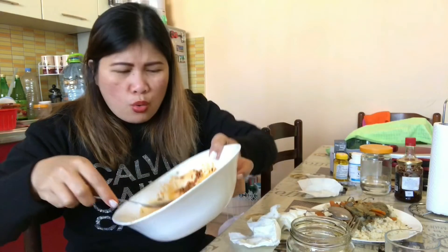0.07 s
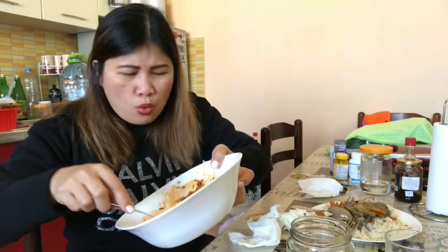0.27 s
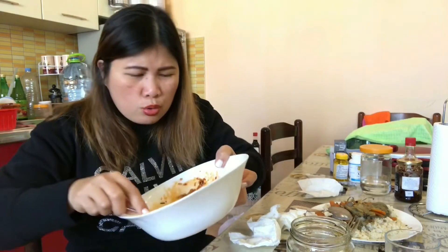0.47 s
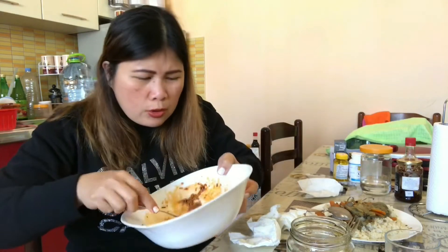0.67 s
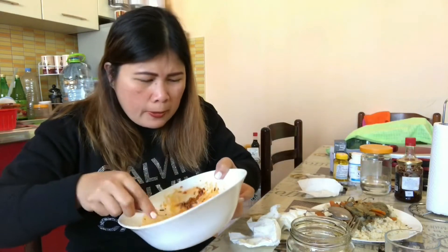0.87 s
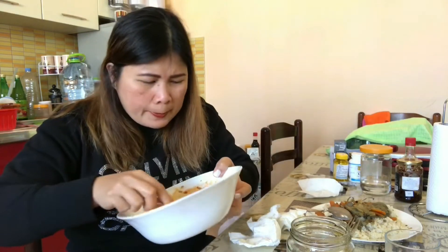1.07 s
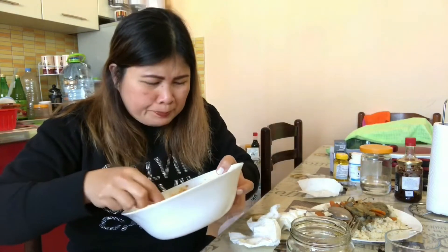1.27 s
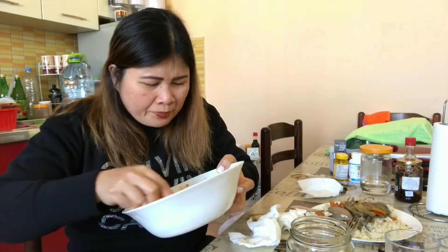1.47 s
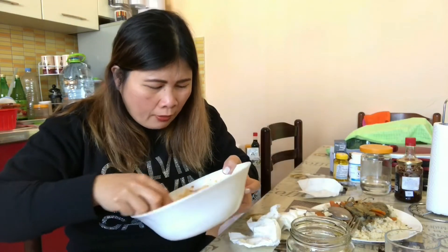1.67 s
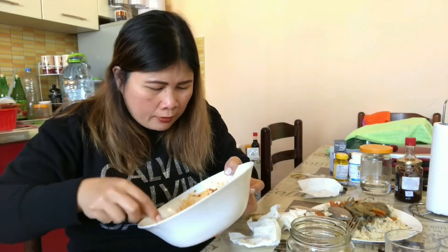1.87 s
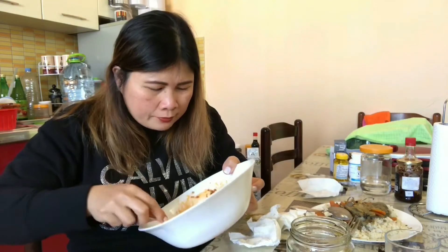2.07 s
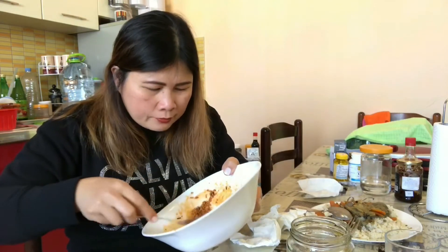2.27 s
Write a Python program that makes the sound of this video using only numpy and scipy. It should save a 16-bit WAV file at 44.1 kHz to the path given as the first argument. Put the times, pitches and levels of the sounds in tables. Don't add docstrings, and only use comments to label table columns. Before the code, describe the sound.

A fork scrapes a food-coated ceramic bowl in a quiet kitchen, ending with one hard ringing clank

```python
import sys
import numpy as np
from scipy import signal
from scipy.fft import rfft, irfft
from scipy.io import wavfile
from scipy.ndimage import uniform_filter1d

SR = 44100
rng = np.random.default_rng(int(sys.argv[2]) if len(sys.argv) > 2 else 0)


def generate_wav(sig):
    pcm = np.round(np.clip(np.atleast_2d(sig).T, -1, 1) * 32767).astype(np.int16)
    wavfile.write(sys.argv[1], SR, pcm)


def ratio(d):
    e = np.asarray(d, float) / 20
    return 10 ** e


N = 102576
MAIN_RING_HZ = 2930

# pitch_hz, level_db (per Hz)
WASH = [(35, -54), (60, -14.5), (130, -12.5), (252, -1), (600, -11.5), (1100, -11.5), (2500, -23),
        (16000, -46)]
# pitch_hz, width_hz, level_db
FRIDGE = [(47, 3.7, -64), (88.1, 8, -68), (171.6, 8.6, -60.5), (208, 8, -83), (260.5, 30, -63),
          (293.6, 7.5, -73), (345.7, 5.5, -73), (553, 1.33, -66)]
INSIDE_HZ = [1997, 2300, 2929, 2965, 4000, 4930, 5895, 6982, 7300, 7560, 8091, 9130, 11300, 5300]
# level_db, t60_s (time to fade by 60 dB)
INSIDE = [(-11, 0.12), (-7.5, 0.064), (6.7, 0.076), (-16, 0.011), (-24, .025), (-14, 0.072), (-7.5, 0.089),
          (-1.5, 0.068), (-5.5, 0.053), (-10, 0.091), (-18, 0.073), (-20, 0.066), (-15, 0.023),
          (-7.5, 0.092)]
# start_s, level_db, tilt_below_db_per_octave, tilt_above_db_per_octave, crack_db
TAPS = [
    (.0690, -54.5, 22.5, 7, -41.5),
    (.2225, -63, -5, 5.5, -49),
    (.2570, -50, -8, -20, -56),
    (.6330, -53.5, -7, -12, -75),
    (.8025, -47, -3, -3.5, -41),
    (.8480, -50, -17, -9, -68),
    (1.0775, -36.5, 20, 4.5, -36),
    (1.3605, -45.5, -22, -22, -71),
    (1.7710, -84, 10, 9, -70),
    (1.7935, -77, .1, 7, -56),
]
# pitch_hz, level_db (per Hz)
HISS = [(500, -20), (1500, -23), (4000, 5.5), (6000, 4.9), (7800, 0.5), (9000, -5.5), (12000, -8),
        (16000, -10)]
# start_s, length_s, ring_db, hiss_db, tilt_db_per_octave
SCRAPES = [(0.189, 0.086, -68, -64.5, 6), (0.254, .045, -58.5, -56.5, 12), (0.41, 0.082, -95, -76, 8),
           (0.621, 0.055, -51.5, -54, 7.5), (0.796, 0.037, -67, -60.5, -1), (0.837, 0.04, -58, -65, 2),
           (0.917, 0.157, -67, -53.5, 4.5), (1.072, 0.045, -51, -54.5, -0.5), (1.138, 0.063, -59, -58, 0),
           (1.189, 0.067, -50, -54, 2), (1.291, 0.08, -54.5, -56.5, -1), (1.35, 0.02, -46, -55, -6),
           (1.388, 0.013, -80, -56, -6)]
# pitch_hz, t60_s
TINES = [(2750, .008), (4100, .007), (5150, .008), (6000, .008), (7300, .008), (8600, .006), (11600, .005)]
# start_s, level_db, treble_tilt_db_per_octave
KNOCKS = [
    (.862, -39, -2.5),
    (.886, -43.5, -7.5),
    (1.0095, -33, -0.5),
    (1.021, -37, -15),
    (1.031, -37.5, -0.5),
    (1.078, -37.5, 1.5),
    (2.163, -44, 8),
]
# pitch_hz, level_db, t60_s
KNOCK = [(367, -5.3, 0.044), (455, 1.5, 0.015), (864, -4.5, 0.017), (1040, 5, 0.011), (1250, 9.5, 0.0083)]
RIM_HZ = [603, 1200, 1923, 2005, 2900, 2930, 5265, 5365, 5895, 6036, 6510, 6530, 7412, 9810]
# level_db, t60_s
RIM = [(-25.5, 0.22), (-4.5, 0.062), (-18, 0.15), (-15.5, .2), (-17.5, 0.15), (2.4, 0.046), (-1.5, 0.035),
       (0, 0.023), (-3, 0.046), (-13.5, 0.45), (-12.5, .3), (6, 0.045), (-13, 0.13), (-9, 0.047)]
FORK_HZ = [1420, 2170, 2400, 3550, 4400, 4970, 5120, 6240, 7030, 7850, 8650, 11480, 13406]
# level_db, t60_s
FORK = [(-4, 0.014), (0, 0.01), (-28, 0.06), (4, 0.0087), (-14, 0.051), (-11, 0.066), (-9.5, 0.055),
        (-14, 0.092), (-19, .06), (-12, 0.075), (-12, 0.079), (-24, 0.055), (-20, 0.046)]
# start_s, level_db, tilt_below_db_per_octave, tilt_above_db_per_octave, crack_db
BLOWS = [
    (2.0640, -61, -9, 3.8, -73),
    (2.0872, -12, -1.4, 0.033, -14.5),
]
# start_s, level_db, tilt_below_db_per_octave, tilt_above_db_per_octave, crack_db
BOUNCES = [
    (2.1612, -17, -18, -14, -34),
    (2.2925, -70, -9, -6, -56),
]


def table(rows):
    return np.array(rows, float).T


def colour(x, points, tilt_db=0.):
    hz, db = table(points)
    f = np.maximum(np.arange(len(x) // 2 + 1) * SR / len(x), 20)
    gain_db = np.interp(np.log(f), np.log(hz), db) + tilt_db * np.log2(f / 4000)
    return irfft(rfft(x) * ratio(gain_db), len(x))


def unit(x):
    return x / np.sqrt(np.mean(x ** 2))


def mode(x, hz, t60):
    r = np.exp(-np.log(1000) / (max(t60, .002) * SR))
    w = 2 * np.pi * hz / SR
    return signal.lfilter([0, r * np.sin(w)], [1, -2 * r * np.cos(w), r * r], x)


def walk(rate):
    k = int(SR / rate)
    steps = np.repeat(rng.standard_normal(N // k + 1), k)
    return 1.3 * uniform_filter1d(uniform_filter1d(steps, k), k)[:N]


def kitchen():
    wash_db, flicker_db, swell_db = -55, 1.88, 0.13
    spectrum = rfft(unit(colour(rng.standard_normal(N), WASH)))
    f = np.arange(N // 2 + 1) * SR / N
    swell = walk(0.85)
    out = np.zeros(N)
    for low_hz in 20 * 2. ** np.arange(11):
        octave = irfft(spectrum * (f >= low_hz) * (f < 2 * low_hz), N)
        out += octave * ratio(flicker_db * walk(8.77) + swell_db * swell)
    out *= ratio(wash_db)
    for hz, width, db in FRIDGE:
        out += ratio(db) * unit(mode(rng.standard_normal(N), hz, 3.1 / width))
    return out


def rustle():
    level_db, pitch_hz, fall_s = -57.5, 975, 0.28
    cloth = unit(mode(rng.standard_normal(N), pitch_hz, 0.0062))
    fade = np.exp(-np.arange(N) / SR / fall_s)
    return ratio(level_db + 2.7 * walk(16.7)) * fade * cloth


def strikes(rows, pitches, modes, place_db, crack_tilt_db=0):
    crack_s, crack_rise_s, contact_t60_s = 0.0026, 0.00065, 0.0018
    at, db, low_db, top_db, crack_db = table(rows)
    start = (at * SR).astype(int)
    place = rng.standard_normal((len(rows), len(modes)))
    out = np.zeros(N)
    for k, (hz, (mode_db, t60)) in enumerate(zip(pitches, modes)):
        octaves = np.log2(hz / MAIN_RING_HZ)
        tilt_db = low_db * max(-octaves, 0) + top_db * max(octaves, 0)
        kick = np.zeros(N)
        kick[start] = ratio(db + mode_db + tilt_db + place_db * place[:, k])
        out += (-1) ** k * (mode(kick, hz, t60) - mode(kick, hz, contact_t60_s))
    t = np.arange(2048) / SR
    shape = np.exp(-t / crack_s) * np.minimum(t / crack_rise_s, 1)
    for s, c in zip(start, crack_db):
        burst = unit(colour(rng.standard_normal(len(t)), HISS, crack_tilt_db)) * shape
        out[s:s + len(t)] += ratio(c) * burst[:N - s]
    return out


def taps():
    return strikes(TAPS, INSIDE_HZ, INSIDE, place_db=1.2)


def room(x):
    level_db, t60_s, treble_t60_s, gap_s = -9, .48, .36, .004
    t = np.arange(SR // 2) / SR
    noise = rng.standard_normal(len(t))
    low = signal.lfilter(*signal.butter(1, 5000, fs=SR), noise)
    tail = low * ratio(-60 * t / t60_s) + (noise - low) * ratio(-60 * t / treble_t60_s)
    tail = tail * np.clip(t / gap_s - 1, 0, 1)
    return ratio(level_db) * signal.fftconvolve(x, tail / np.sqrt(np.sum(tail ** 2)))[:N]


def inside_ring(x):
    out = np.zeros(N)
    for k, (hz, (db, t60)) in enumerate(zip(INSIDE_HZ, INSIDE)):
        skirt_db = 6 * abs(np.log2(hz / MAIN_RING_HZ))
        out += (-1) ** k * ratio(db - skirt_db) * mode(x, hz, t60)
    return out


def scrapes():
    slips_per_s, slip_spread_db, judder_db = 2500, 2.5, 2.5
    rise_share, fall_s = 0.5, .016
    tine_db, tine_shift = -3, .03
    lock_hz, lock_db, lock_wobble = 2935, .5, .009
    t = np.arange(N) / SR
    slip_now = rng.random(N) < slips_per_s / SR
    slips = slip_now * ratio(slip_spread_db * rng.exponential(size=N)) * rng.standard_normal(N)
    slips = unit(unit(slips) + 1.9 * rng.standard_normal(N)) * ratio(judder_db * walk(90.64))
    chance = rng.standard_normal((len(SCRAPES), len(TINES), 2))
    wobbles = [walk(31.3) for _ in TINES]
    patches = [ratio(2.2 * w) for w in wobbles]
    out, drive = np.zeros(N), np.zeros(N)
    for (start, length, ring_db, hiss_db, tilt_db), pick in zip(SCRAPES, chance):
        rise = np.clip((t - start) / (rise_share * length), 0, 1) ** 2
        push = rise * np.exp(-np.maximum(t - start - length, 0) / fall_s)
        drive += ratio(ring_db) * push
        hiss = unit(colour(slips, HISS, tilt_db))
        tines = np.zeros(N)
        for (hz, t60), (shift, level), patch in zip(TINES, pick, patches):
            tines += ratio(3.3 * level) * patch * mode(hiss, hz * (1 + tine_shift * shift), t60)
        out += ratio(hiss_db) * push * (hiss + ratio(tine_db) * unit(tines))
    locked = np.sin(2 * np.pi * np.cumsum(lock_hz * (1 + lock_wobble * wobbles[-1])) / SR)
    loose_ring = inside_ring(slips * drive) / np.std(inside_ring(slips))
    locked_ring = inside_ring(locked * drive) / np.std(inside_ring(locked))
    return out + loose_ring + ratio(lock_db) * locked_ring


def knocks():
    contact_t60_s = 0.0046
    at, db, top_db = table(KNOCKS)
    out = np.zeros(N)
    for hz, mode_db, t60 in KNOCK:
        kick = np.zeros(N)
        kick[(at * SR).astype(int)] = ratio(db + mode_db + top_db * np.log2(hz / 350))
        out += mode(kick, hz, t60) - mode(kick, hz, contact_t60_s)
    return out


def rim_blows():
    pitches, modes = RIM_HZ + FORK_HZ, RIM + FORK
    blow = strikes(BLOWS, pitches, modes, place_db=0)
    return blow + strikes(BOUNCES, pitches, modes, place_db=0, crack_tilt_db=9)


def scene():
    inside_wet_db = -4
    inside = taps() + scrapes() + knocks()
    rim = rim_blows()
    tail = room(rim + ratio(inside_wet_db) * inside)
    return (kitchen() + rustle() + inside + rim + tail)[None]


def band_limit(x):
    return signal.sosfilt(signal.butter(12, 16920, fs=SR, output="sos"), x)


def record(dry):
    x = signal.sosfilt(signal.ellip(8, .2, 60, 15900, fs=SR, output="sos"), dry)
    x = signal.sosfilt(signal.butter(4, 38, "high", fs=SR, output="sos"), x)
    return band_limit(x)


dry = scene()
out = record(dry)
generate_wav(out)
```